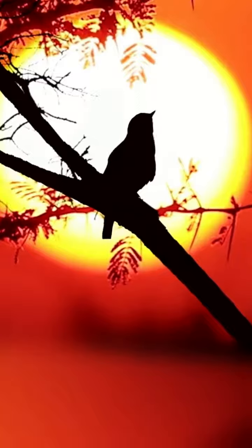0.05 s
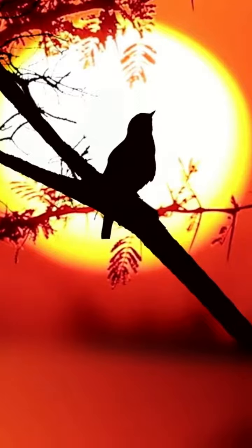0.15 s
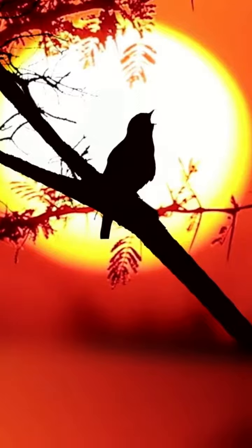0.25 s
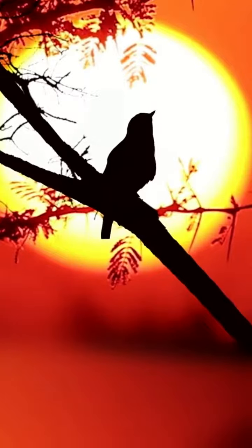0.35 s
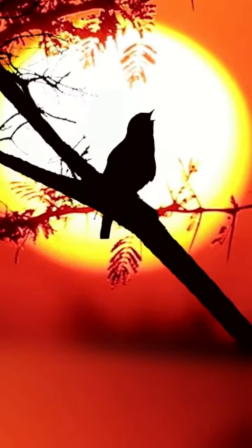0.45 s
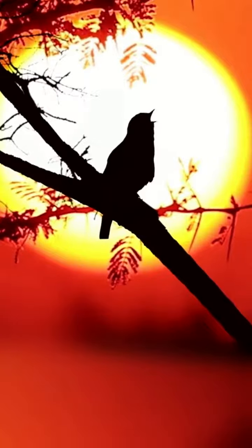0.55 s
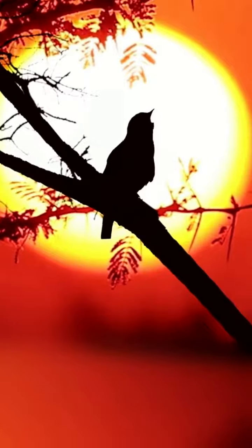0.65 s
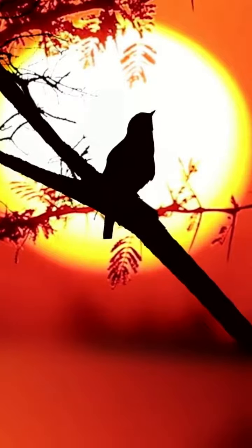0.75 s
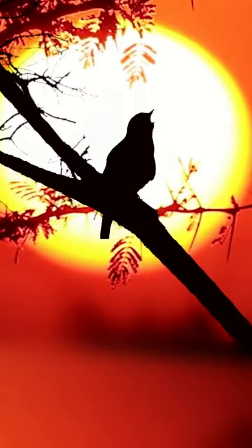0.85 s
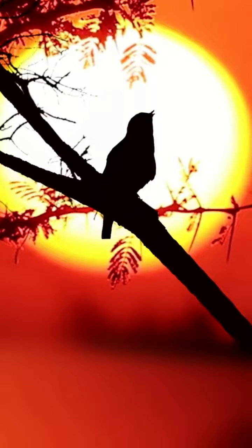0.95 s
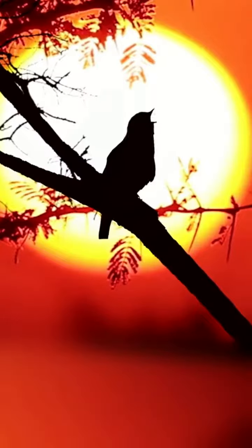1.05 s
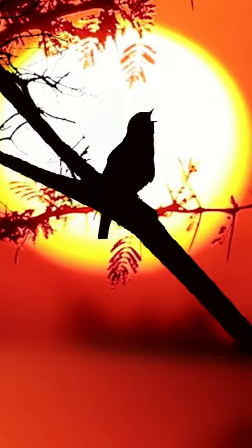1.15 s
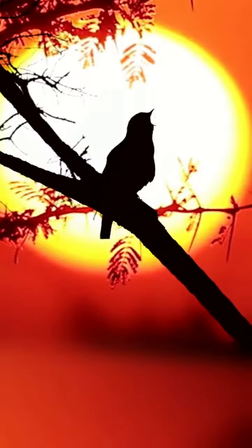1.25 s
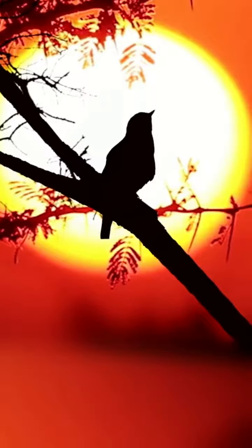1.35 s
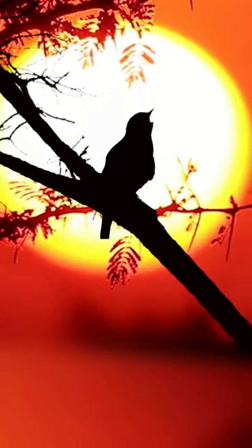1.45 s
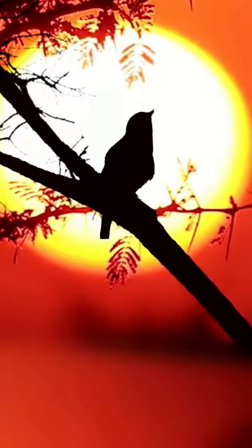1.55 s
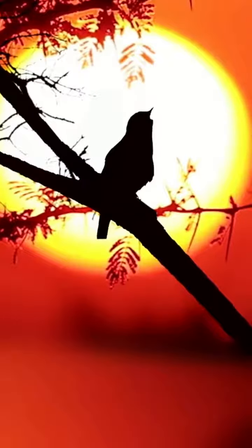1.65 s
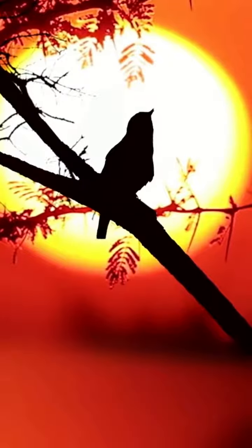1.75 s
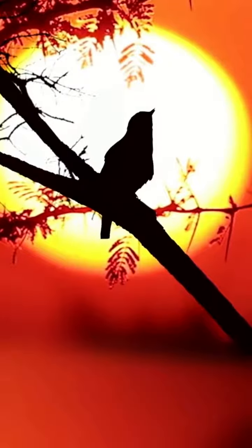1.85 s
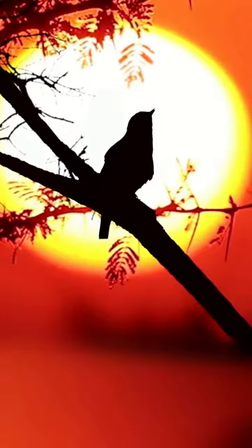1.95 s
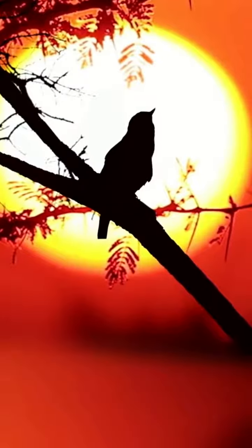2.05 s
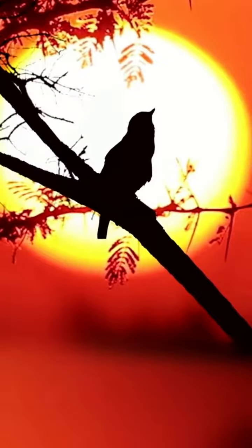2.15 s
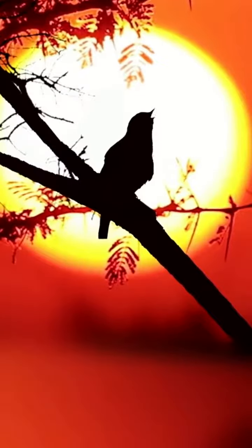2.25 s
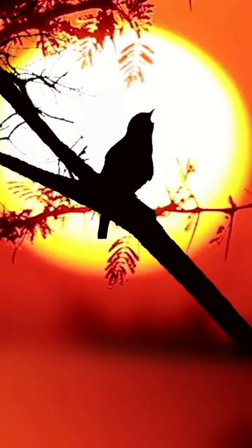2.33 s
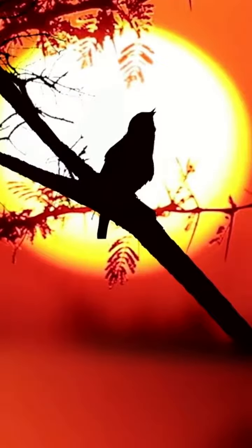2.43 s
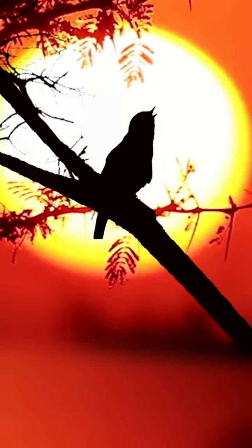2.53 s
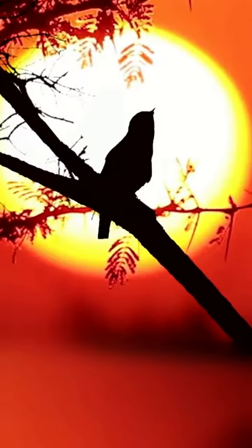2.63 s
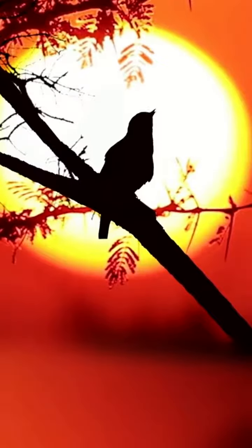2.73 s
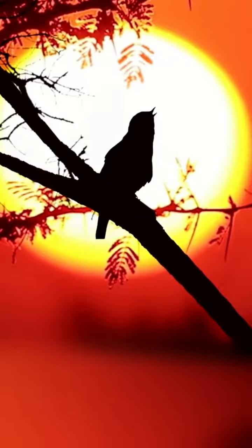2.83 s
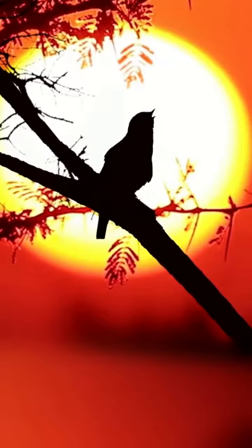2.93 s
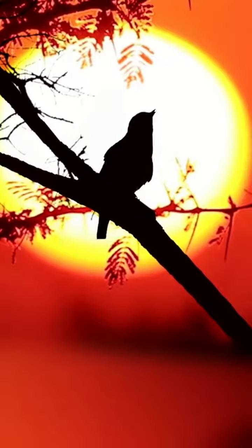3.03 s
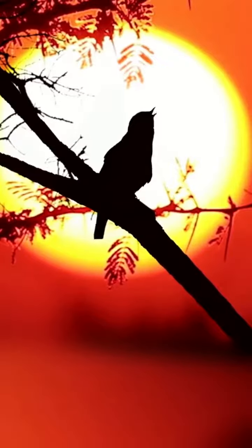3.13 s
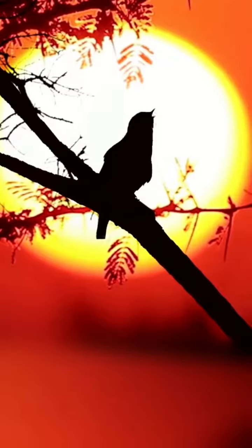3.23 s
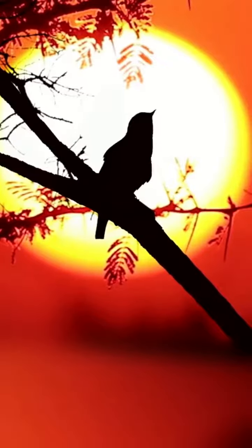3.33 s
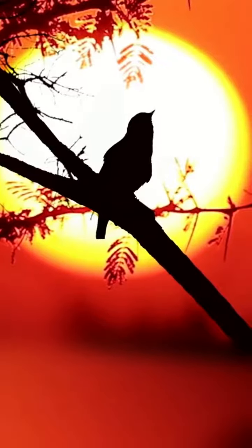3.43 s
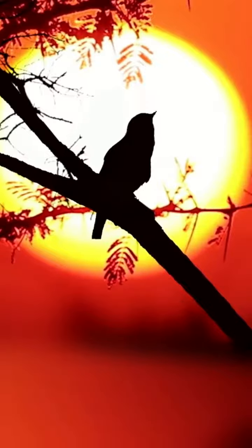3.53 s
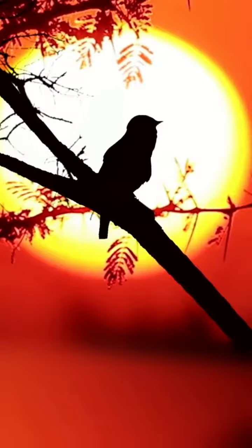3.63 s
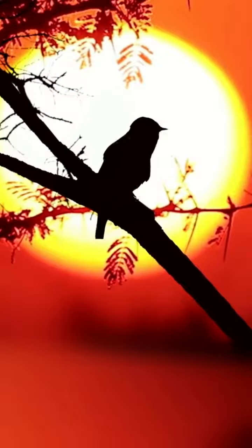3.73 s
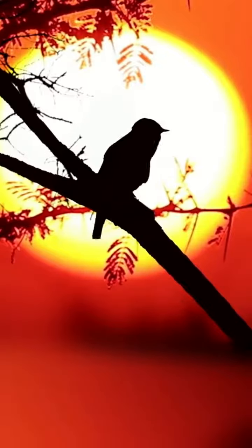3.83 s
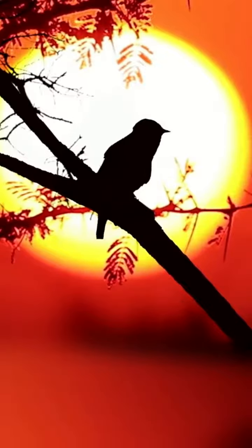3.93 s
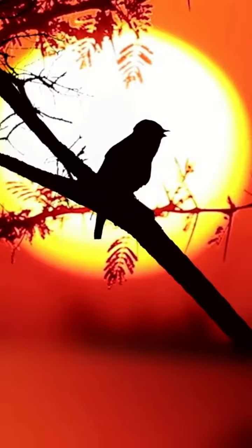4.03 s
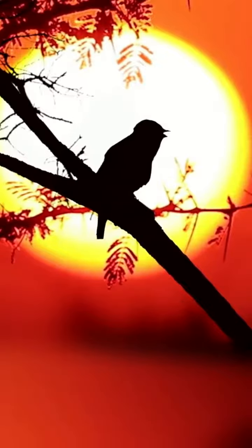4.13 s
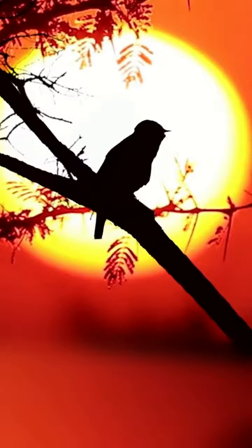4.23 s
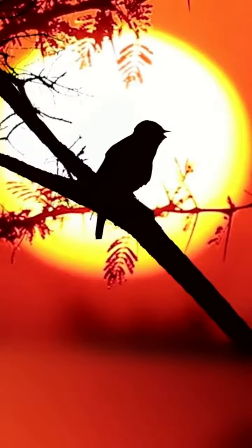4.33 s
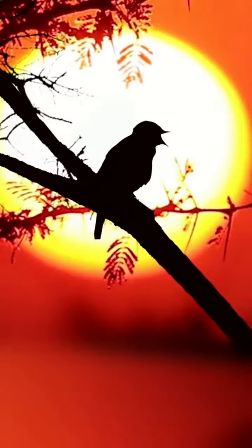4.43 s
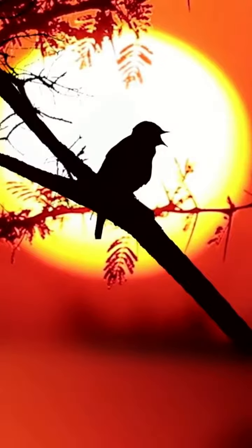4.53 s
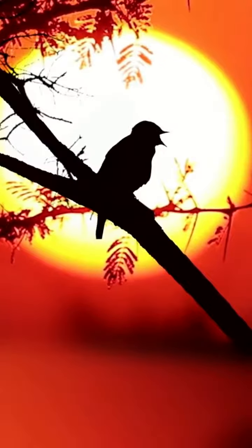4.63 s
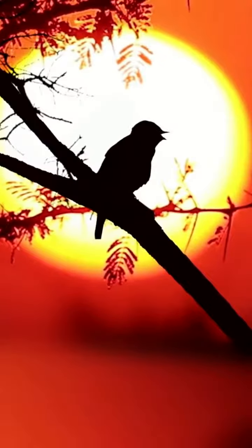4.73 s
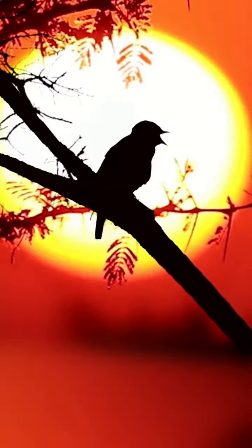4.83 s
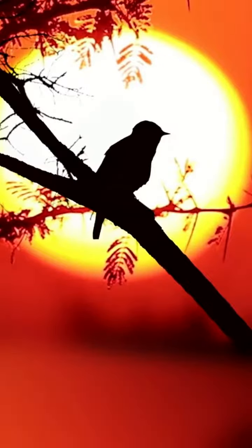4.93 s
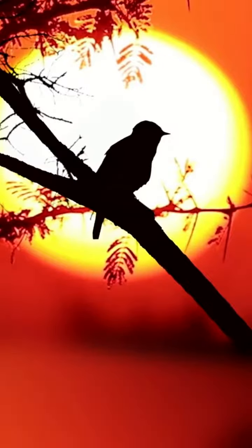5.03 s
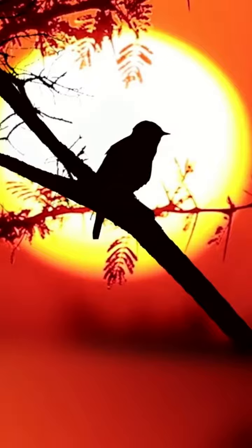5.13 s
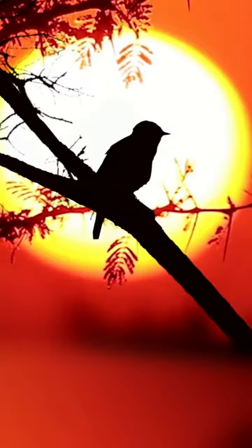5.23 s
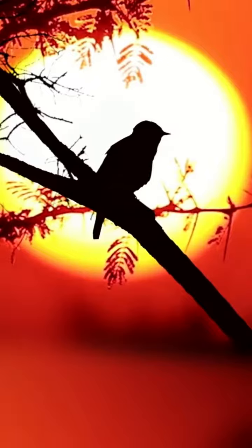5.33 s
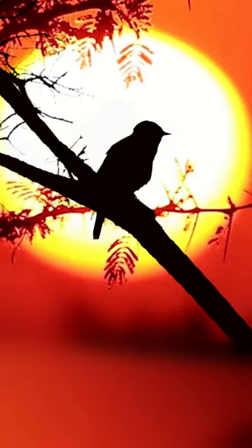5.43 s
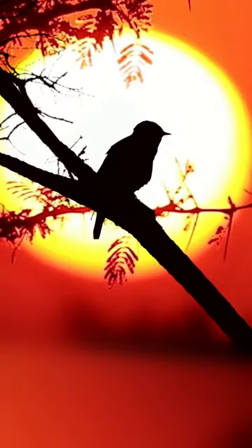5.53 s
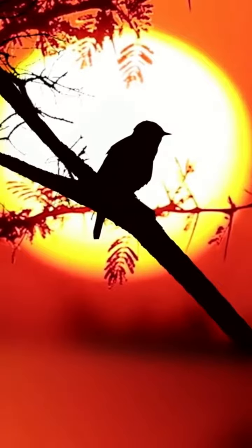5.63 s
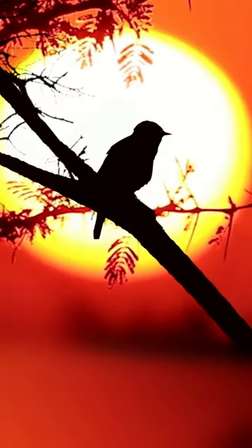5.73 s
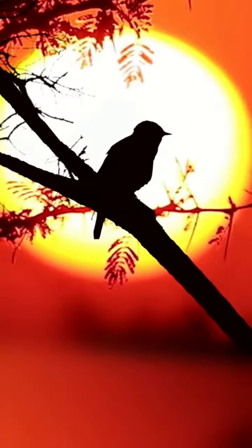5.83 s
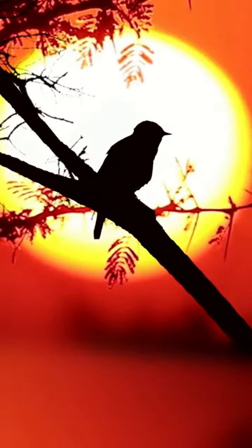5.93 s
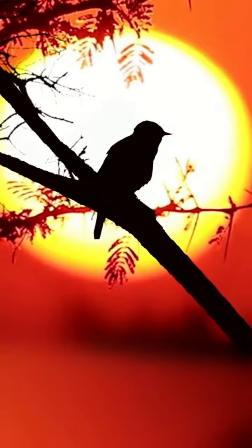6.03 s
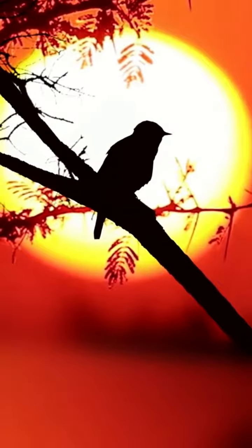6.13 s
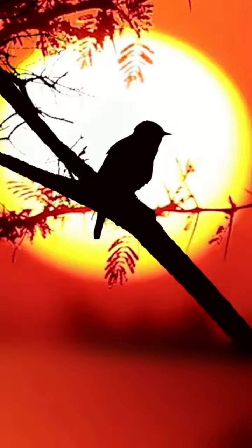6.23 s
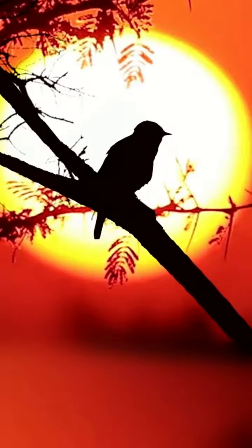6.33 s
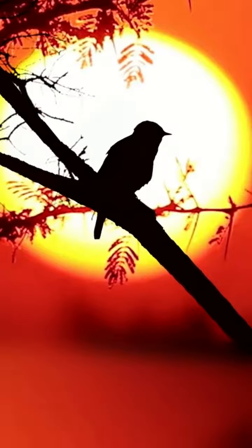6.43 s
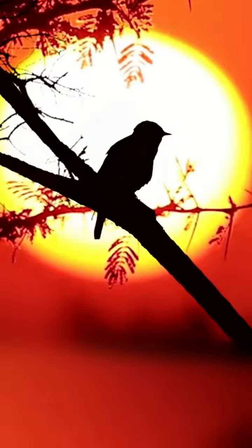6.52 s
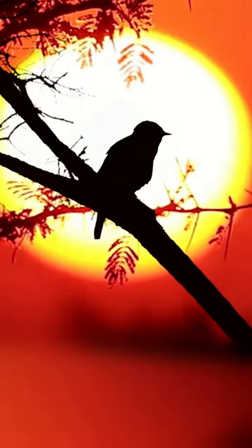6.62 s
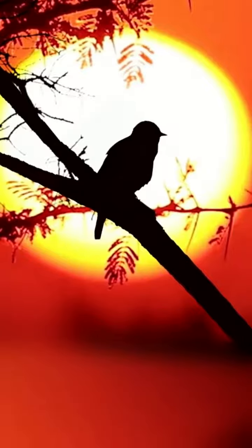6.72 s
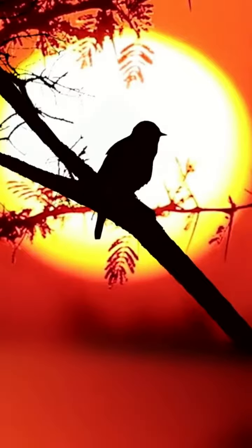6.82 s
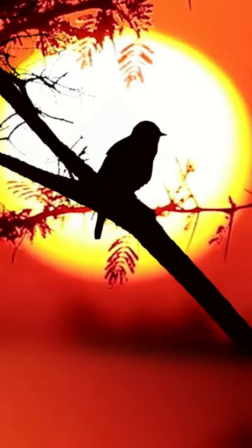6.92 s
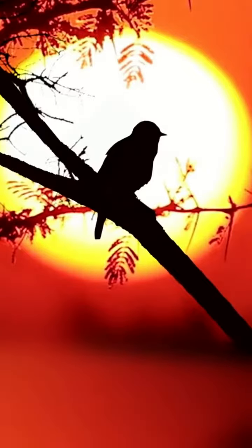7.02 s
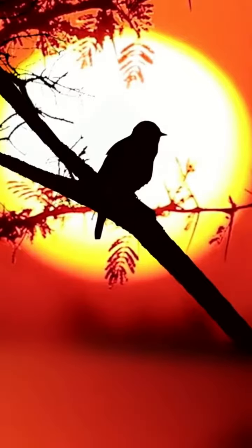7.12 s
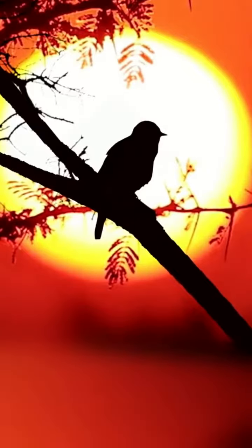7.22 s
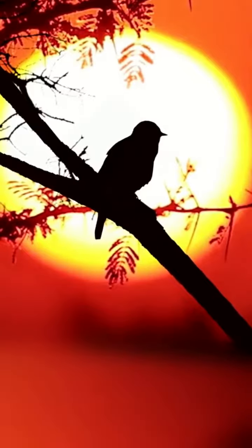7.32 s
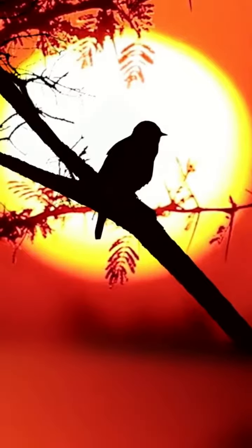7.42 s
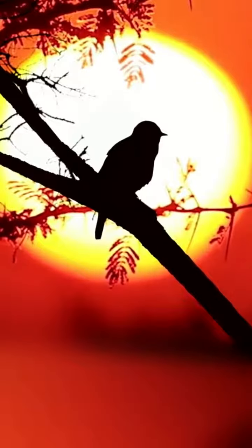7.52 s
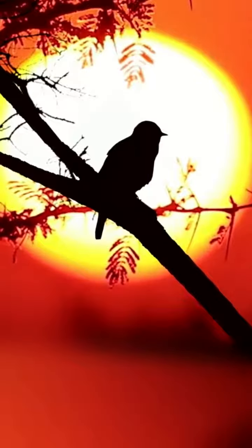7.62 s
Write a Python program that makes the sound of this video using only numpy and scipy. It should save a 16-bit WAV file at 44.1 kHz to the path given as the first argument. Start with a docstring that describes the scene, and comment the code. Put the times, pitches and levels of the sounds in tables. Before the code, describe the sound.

A nightingale sings one phrase close by, slightly to the right, at the edge of a wood. From the start to about 1.8 seconds it gives three high whistles, each followed by a sharp downward whip and a double tick. Around 2 seconds comes a loud falling note, then lower notes and a short rasp at 2.6. Three mellow fluted tones, each ending in a quick sweep, run from 2.8 to 3.6 seconds. A fast trill of falling sweeps follows until 4.6, then a high buzz and a final high flick at about 5.1. The trees scatter the song, returning a soft echo and a lingering tail. From about 5.5 seconds to the end near 7.5, only distant birds are heard, with thin peeps, chips and mellow calls. A faint outdoor hush of air and leaves lies underneath, swelling slightly midway.

```python
"""A nightingale sings one close phrase at the edge of a wood: three whistles, each with a whip and a double
tick, low notes and a rasp, four flutes, a trill of fast sweeps, a two-voiced buzz, a high flick. Each note is
one pitch glide from the syrinx, shaped by throat and beak; ticks and rasp are noise bursts. Trees scatter the
song and return a late echo. Other birds answer far off over a faint outdoor hush."""
import sys
import numpy as np
from scipy import signal
from scipy.fft import rfft, irfft, next_fast_len
from scipy.io import wavfile

SR = 44100
rng = np.random.default_rng(int(sys.argv[2]) if len(sys.argv) > 2 else 0)


def put_to_file(sound):
    """Save the sound as 16-bit audio at rate SR, in the file named by the first command-line argument."""
    columns = np.atleast_2d(sound).T  # one column per channel
    safe = np.clip(columns, -1, 1)
    whole_steps = np.round(safe * 32767)
    wavfile.write(sys.argv[1], SR, whole_steps.astype(np.int16))


N = 338247

# hush spectrum and its side-channel filter: (frequency [Hz], gain [dB])
HUSH_SPECTRUM = [(15, -30), (25, -10), (71, -7), (110, -9.5), (200, -12.5), (300, -11), (500, -8),
                 (850, -6), (1400, -6.5), (2000, -2), (3200, -2), (4200, -5.5), (6000, -10), (8000, -16),
                 (11400, -21), (12500, -38)]
HUSH_SIDE = [(30, -4.5), (60, -4), (150, 2.5), (350, 4), (850, 4.5), (2050, -2), (4970, -15.5),
             (12000, -14.5)]
# breeze gain on the hush; upper hum: (time [s], level [dB])
BREEZE_CURVE = [(3.3, -2.5), (4.4, 3), (5.8, .3), (7.67, -1)]
HUM_CURVE = [(0, -73), (4.8, -70.5), (5.3, -59), (6.2, -63.5), (7.67, -63)]
# rumble swells: (time [s], length [s], level [dB])
RUMBLES = [(1.1, .95, -58.5), (4.1, 1.1, -57), (5.75, .8, -60)]

# syllable shapes: keywords of syllable(), units in the keys
WHISTLE = dict(start_hz=3075, length_s=.124, linger_s=.019, glide_oct=-.2, glide_s=.021, drift_oct_per_s=-.29, attack_s=.016, hold_s=.016, fade_db_per_s=88, release_s=.0125)
WHIP = dict(start_hz=8200, length_s=.042, linger_s=.0018, glide_oct=-1.13, glide_s=.0034, drift_oct_per_s=-25, attack_s=.0072, hold_s=.018, fade_db_per_s=720, release_s=.01)
DROP = dict(start_hz=3800, length_s=.077, linger_s=.0028, glide_oct=-1.66, glide_s=.0142, drift_oct_per_s=-1.45, attack_s=.0008, fade_db_per_s=62, release_s=.015, throat_hz=2510, throat_q=8.5)
FLUTE = dict(start_hz=1872, length_s=.155, linger_s=.023, glide_oct=-.03, glide_s=.011, drift_oct_per_s=-.07, attack_s=.035, hold_s=.08, fade_db_per_s=230, release_s=.014)
RISE = dict(start_hz=768, length_s=.165, glide_oct=.35, glide_s=.022, drift_oct_per_s=1.65, attack_s=.055, fade_db_per_s=40, release_s=.022)
SWEEP = dict(start_hz=2560, length_s=.031, linger_s=.0015, glide_oct=-1.2, glide_s=.015, drift_oct_per_s=-7.5, attack_s=.0024, hold_s=.0048, fade_db_per_s=640, release_s=.006, throat_hz=2300, throat_q=1.9)
HIGH_PIP = dict(start_hz=8620, length_s=.01, drift_oct_per_s=-14, attack_s=.0035, release_s=.005)
LOW_PIP = dict(start_hz=5520, length_s=.017, drift_oct_per_s=-5.5, attack_s=.0045, release_s=.009)
FLICK = dict(start_hz=3000, length_s=.087, linger_s=.0055, glide_oct=1.46, glide_s=.0025, drift_oct_per_s=-6, attack_s=.012, hold_s=.028, fade_db_per_s=115, release_s=.011)
FAR_CHIP = dict(start_hz=6400, length_s=.07, glide_oct=-.66, glide_s=.055, attack_s=.012, hold_s=.032, fade_db_per_s=330, release_s=.012)
FAR_PEEP = dict(start_hz=5450, length_s=.035, drift_oct_per_s=-2.6, attack_s=.009, release_s=.02)
FAR_CALL = dict(start_hz=1665, length_s=.12, drift_oct_per_s=-.8, attack_s=.025, release_s=.028)
# notes: (time [s], level [dB], pitch [ratio], length [ratio])
WHISTLES = [(.133, -6, .998, .92), (.750, -5.1, .997, 1.0), (1.363, -5.3, 1.013, .99)]
WHIPS = [(.312, -8.5, .98, 1.06), (.942, -7.4, .98, 1.01), (1.5508, -8, 1.01, 1.0)]
DROPS = [(1.944, -1.7, 1, 1)]
FLUTES = [(2.080, -8.2, .965, .45), (2.765, -7, 1.025, .87), (3.083, -5.9, 1.001, .97),
          (3.403, -7.1, .996, 1.12)]
RISES = [(2.315, -22, 1, 1), (3.753, -32.5, .94, .218), (3.942, -32.5, .93, .2), (4.132, -31, .94, .19),
         (4.322, -30.5, .94, .198), (4.502, -30.5, 0.93, 0.19)]
SWEEPS = [(2.9386, -3.9, 1.095, 1.08), (3.2523, -2.2, 1.087, 1.14), (3.5771, -3.2, 1.09, 1.06),
          (3.7038, -12, .87, .76), (3.8034, -6.2, .9, .75), (3.8905, -5.5, .934, .78),
          (3.9903, -5.7, .935, .8), (4.078, -5, .94, .75), (4.1785, -5.2, .937, .77),
          (4.2686, -6, .92, .76), (4.3671, -5.3, .945, .78), (4.4506, -5.6, .935, .765),
          (4.5496, -5, .984, .78)]
FLICKS = [(5.084, -11, 1, 1)]
FAR_CHIPS = [(4.0, -38.5, 1.03, .4), (4.335, -35.5, 1, .44), (6.52, -41.5, .58, 1), (6.555, -43, .57, 1),
             (6.6, -42.5, .59, 1), (6.825, -36.5, 1, .95)]
FAR_PEEPS = [(5.48, -36.5, .99, 1), (5.815, -36.5, .98, 1), (6.17, -36, .99, 1)]
FAR_CALLS = [(6.02, -40, 1.165, .9), (6.34, -40.5, .989, .98), (6.5, -37, .995, 1.03),
             (6.655, -37, .997, 1.16), (6.73, -35.5, 1.15, 1.06), (6.835, -36, .995, 1),
             (7.035, -37, 1.14, .96), (7.36, -36.5, 1.15, 1.02)]
# noise bursts: (time [s], level [dB], length [s])
TICKS = [(0.5413, -21, 0.0052), (.5525, -19.5, .005), (1.1765, -20.5, 0.0049), (1.1885, -23, 0.0051),
         (1.768, -19, 0.0051), (1.779, -18.5, .006), (2.5821, -13, 0.0137), (2.597, -22.5, .014),
         (2.608, -14.5, .014), (5.087, -19.5, .012)]
# pip trains: (time [s], length [s], rate [1/s], level [dB], fade [dB/s])
BUZZ_RUNS = [(4.654, .136, 70.5, -8.5, 58), (4.807, .187, 46, -12.5, 8)]
# beak filter on overtones and air; burst spectra: (frequency [Hz], gain [dB])
BEAK_SPECTRUM = [(2000, -29.5), (3700, -13), (5500, -10.5), (7300, -18), (9100, 1), (11000, -1),
                 (12000, -11.5), (13000, -28)]
TICK_SPECTRUM = [(300, -36), (900, -14.5), (3000, -9), (4800, 3.5), (6500, -4), (8500, -6), (11500, -11.5),
                 (14000, -14)]
RASP_SPECTRUM = [(400, -48), (1500, -15), (3200, -14), (4400, -4), (6200, -1.5), (8000, -13.5),
                 (11500, -13.5), (14000, -23)]

# filters on twig reflections, tail, echoes and the wood's side channel: (frequency [Hz], gain [dB])
TWIG_SPECTRUM = [(1000, -3), (2000, -4.5), (3000, -2), (6000, 6), (12000, 4)]
TAIL_SPECTRUM = [(500, -19), (1200, -10), (2000, -9), (2800, -11), (4500, -8), (7000, -9), (12000, -13)]
ECHO_SPECTRUM = [(1000, -5), (1800, -1.5), (2600, -1.5), (3100, -6), (5000, -22), (9000, -26)]
WOOD_SIDE = [(500, -3), (1200, -2), (2000, -1), (3000, -0.5), (4500, -10), (10000, -5)]
# tail decay: (frequency [Hz], T60 [s])
TAIL_T60 = [(500, 0.2), (1200, 2.96), (2000, 3.05), (2800, 2.48), (4500, 1.0), (8000, 0.6), (12000, 1.2)]
# pitches the trees sustain: (frequency [Hz], width [Hz], boost [dB])
WOOD_RINGS = [(1830, 31, 2.5), (2706.5, 22, 11)]
# echoes off rows of trees: (delay [s], blur [s], mid [dB], side [dB])
ECHOES = [(.135, .006, -29, -27), (.29, .012, -21, -17)]
# single reflections off near branches and ground: (delay [s], gain [dB])
BRANCHES = [(.0063, -20), (.0116, -18.5), (.0164, -17)]


def gain_of(db):
    """Decibels to amplitude."""
    return 10 ** (np.asarray(db) / 20)


def unit_rms(x):
    """Scale to rms 1."""
    return x / np.sqrt(np.mean(x ** 2) + 1e-20)


def lookup(points, hz):
    """Interpolate over log frequency."""
    points_hz, values = np.transpose(points)
    return np.interp(np.log(hz + 1), np.log(points_hz + 1), values)


def add(mix, at_s, sound):
    """Mix in place."""
    part = mix[max(round(at_s * SR), 0):][:len(sound)]
    part += sound[:len(part)]


def filtered(x, spectrum):
    """Apply a dB spectrum."""
    return irfft(rfft(x) * gain_of(lookup(spectrum, np.fft.rfftfreq(len(x), 1 / SR))), len(x))


def band_noise(samples, hz, width_hz):
    """Gaussian band, rms about 1; a random waver if centred on 0 Hz."""
    size = next_fast_len(max(samples, 2 ** 13))
    offset = (np.fft.rfftfreq(size, 1 / SR) - hz) / width_hz
    bell = np.exp(-.5 * np.minimum(offset ** 2, 100))
    return unit_rms(irfft(rfft(rng.standard_normal(size)) * bell, size))[:samples]


def stereo(mid, side):
    """Mid/side to left/right."""
    return np.array([mid + side, mid - side])


def hush(air_db=-43.5, rumble_rest_db=-67, ramp_s=.25):
    """Far leaves and air, a swelling low rumble, two faint hums."""
    t = np.arange(N) / SR
    breeze, hum = (gain_of(np.interp(t, *np.transpose(curve))) for curve in (BREEZE_CURVE, HUM_CURVE))
    mid, side = (unit_rms(filtered(rng.standard_normal(N), HUSH_SPECTRUM)) for _ in range(2))
    waver_db = 1.3 * band_noise(N, 0, 2.76)
    air = gain_of(air_db + waver_db) * breeze * stereo(mid, filtered(side, HUSH_SIDE))
    swell = gain_of(rumble_rest_db)
    for at_s, length_s, db in RUMBLES:
        swell = swell + gain_of(db) * np.clip(np.minimum(t - at_s, at_s + length_s - t) / ramp_s, 0, 1)
    rumble = swell * stereo(band_noise(N, 302, 66), band_noise(N, 295, 70))
    return air + rumble + hum * band_noise(N, 502.6, 6) + gain_of(-70.5) * band_noise(N, 70, 4)


def lingering_whistle(level_db=-34, t60_s=1.35):
    """An earlier whistle dying away among the trees."""
    mid, side = (band_noise(N, 2590, 8) + .5 * band_noise(N, 2720, 130) for _ in range(2))
    return gain_of(level_db - 60 * np.arange(N) / SR / t60_s) * stereo(mid, .7 * side)


def syllable(t, start_hz, length_s, attack_s, release_s, linger_s=0, glide_oct=0, glide_s=1,
             drift_oct_per_s=0, hold_s=0, fade_db_per_s=0, throat_hz=1, throat_q=0):
    """Pitch (delayed glide plus steady drift) and envelope (gate, throat resonance, fade)."""
    settled = 1 - np.exp(-np.maximum(t - linger_s, 0) / glide_s)
    hz = start_hz * 2 ** (glide_oct * settled + drift_oct_per_s * t)
    ramp = np.clip(np.minimum(t / attack_s, (length_s - t) / release_s), 0, 1)
    gate = np.sin(np.pi / 2 * ramp) ** 2
    throat = 1 / np.hypot(1, throat_q * (hz / throat_hz - throat_hz / hz))
    fade = gain_of(-fade_db_per_s * np.maximum(t - hold_s, 0))
    return hz, gate * throat * fade


def sing(shape, notes, jitter, overtone_db=-60, air_db=-70, waver=0, flutter_db=0, harmonics=6):
    """Syrinx: one unsteady, near-pure tone per note. The beak filters overtones and rushing air."""
    out = np.zeros(N)
    rush = unit_rms(filtered(rng.standard_normal(2 ** 14), BEAK_SPECTRUM))
    for at_s, level_db, pitch, stretch in notes:
        t = np.arange(0, shape["length_s"] * stretch, 1 / SR) / stretch
        hz, envelope = syllable(t, **shape)
        wobble = 1 + jitter * band_noise(len(t), 0, 300) + waver * band_noise(len(t), 0, 35)
        hz = pitch * hz * wobble
        phase = 2 * np.pi * np.cumsum(hz) / SR
        overtones = sum(gain_of(lookup(BEAK_SPECTRUM, k * hz)) * np.sin(k * phase)
                        * (k * hz < SR / 2) * 2 / k for k in range(2, harmonics + 1))
        air = np.resize(np.roll(rush, rng.integers(len(rush))), len(t))
        voice = np.sin(phase) + gain_of(overtone_db) * overtones + gain_of(air_db) * air
        gain = gain_of(level_db + flutter_db * band_noise(len(t), 0, 250))
        add(out, at_s, gain * envelope * voice)
    return out


def nightingale():
    """Near bird's phrase: held notes almost pure, fast glides rougher."""
    whistles = sing(WHISTLE, WHISTLES, jitter=.0025, overtone_db=-29.5, waver=.0015, harmonics=3)
    flutes = sing(FLUTE, FLUTES, jitter=.0025, overtone_db=-30, air_db=-39, waver=.002, flutter_db=.2)
    whips = sing(WHIP, WHIPS, jitter=.031, overtone_db=-22.5, air_db=-28, flutter_db=1.2)
    drop = sing(DROP, DROPS, jitter=.025, overtone_db=-22, air_db=-29)
    sweeps = sing(SWEEP, SWEEPS, jitter=.02, overtone_db=-38, air_db=-43, flutter_db=1)
    rises = sing(RISE, RISES, jitter=.006, overtone_db=-41)
    flick = sing(FLICK, FLICKS, jitter=.025, overtone_db=-32, air_db=-27.5, flutter_db=2.2)
    return whistles + whips + ticks() + drop + flutes + rises + sweeps + buzz() + flick


def scatter(envelope, taps_per_s=4000):
    """Sparse reflections of random sign, energy 1."""
    signs = rng.choice([-1., 1.], len(envelope))
    taps = signs * (rng.random(len(envelope)) < taps_per_s / SR) * envelope
    return taps / np.linalg.norm(taps)


def wood_response(twig_db, twig_t60_s, tail_db, echoes):
    """Impulse response: twigs at once, trunks as a long tail, far tree rows as blurred echoes."""
    t = np.arange(2 * SR) / SR
    twigs = filtered(scatter(gain_of(-60 * t / twig_t60_s) * (t > .003)), TWIG_SPECTRUM)
    rows = sum(gain_of(db) * scatter(np.exp(-.5 * ((t - delay_s) / blur_s) ** 2))
               for delay_s, blur_s, db in echoes)
    band_hz, frame_s, bands = signal.stft(scatter(1. * (t > .015)), SR, nperseg=256)
    t60_s = lookup(TAIL_T60, band_hz)[:, None]
    decay = gain_of(lookup(TAIL_SPECTRUM, band_hz)[:, None] - 60 * frame_s / t60_s)
    bands = bands * decay * np.sqrt(4 * np.log(1000) / t60_s)  # band energy independent of T60
    tail = signal.istft(bands, SR, nperseg=256)[1][:len(t)]
    far = gain_of(tail_db) * tail + filtered(rows, ECHO_SPECTRUM)
    bin_hz = np.fft.rfftfreq(len(t), 1 / SR)
    rings_db = sum(db * np.exp(-.5 * ((bin_hz - hz) / width_hz) ** 2) for hz, width_hz, db in WOOD_RINGS)
    return gain_of(twig_db) * twigs + irfft(rfft(far) * gain_of(rings_db), len(t))


def wood(song):
    """Stereo reflections; echoes arrive from the sides."""
    mid_echoes = [(delay_s, blur_s, db) for delay_s, blur_s, db, _ in ECHOES]
    side_echoes = [(delay_s, blur_s, db) for delay_s, blur_s, _, db in ECHOES]
    mid = wood_response(twig_db=-8, twig_t60_s=.23, tail_db=0, echoes=mid_echoes)
    side = wood_response(twig_db=-18.5, twig_t60_s=.2, tail_db=-2.2, echoes=side_echoes)
    for delay_s, db in BRANCHES:
        add(mid, delay_s, gain_of([db]))
    return signal.fftconvolve(song[None], stereo(mid, filtered(side, WOOD_SIDE)), axes=1)[:, :N]


def far_birds(twitter_db=-50.5, twitter_count=40):
    """Thin chips, peeps and mellow calls from deeper in the wood."""
    twitter = [(7.5 * when, twitter_db + 5 * loud, .54 + .24 * high, 1 + slow)
               for when, loud, high, slow in rng.random((twitter_count, 4))]
    chips = sing(FAR_CHIP, FAR_CHIPS + twitter, jitter=.022)
    return sing(FAR_CALL, FAR_CALLS, jitter=.0043) + sing(FAR_PEEP, FAR_PEEPS, jitter=.026) + chips


def ticks(rasp_above_s=.009):
    """Toneless bursts: short ones tick in pairs, longer ones rasp."""
    out = np.zeros(N)
    for at_s, level_db, length_s in TICKS:
        size = round(length_s * SR)
        spectrum = RASP_SPECTRUM if length_s > rasp_above_s else TICK_SPECTRUM
        burst = unit_rms(filtered(rng.standard_normal(size), spectrum))
        add(out, at_s, gain_of(level_db) * burst * signal.windows.tukey(size, .35))
    return out


def buzz(sag_per_s=.06, pitch_spread=.004, low_db=-31, accent_db=15, accent_s=.016):
    """Both sides of the syrinx pip together, high and low: a fast run, then a slower; pitch sags."""
    start_s = BUZZ_RUNS[0][0]
    high, low = [], []
    for run_s, length_s, pips_per_s, level_db, fade_db_per_s in BUZZ_RUNS:
        for t in np.arange(0, length_s, 1 / pips_per_s):
            at_s = run_s + t
            pitch = 1 - sag_per_s * (at_s - start_s) + pitch_spread * rng.standard_normal()
            high.append((at_s, level_db - fade_db_per_s * t, pitch, 1))
            low.append((at_s, low_db + accent_db * np.exp((start_s - at_s) / accent_s), pitch, 1))
    high_voice = sing(HIGH_PIP, high, jitter=.018, air_db=-30)
    return high_voice + sing(LOW_PIP, low, jitter=.025, overtone_db=-13, flutter_db=2.2)


def scene():
    """Near bird slightly right; far birds centred, with a larger share of reflections."""
    near, far = nightingale(), far_birds()
    direct = near * gain_of([[-.2], [.2]]) + gain_of(-1.2) * far
    return direct + wood(near + gain_of(1.5) * far) + lingering_whistle() + hush()


def record(dry, cutoff_hz=12400):
    """Low-pass band limit."""
    lowpass = signal.firwin(255, cutoff_hz, window=("kaiser", 8), fs=SR)
    return signal.oaconvolve(dry, lowpass[None], "same")


dry = scene()
out = record(dry)
put_to_file(out)
```